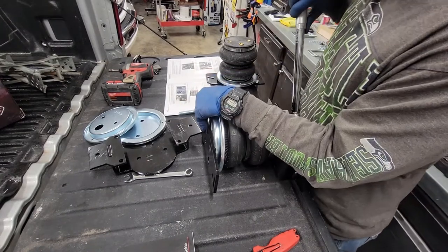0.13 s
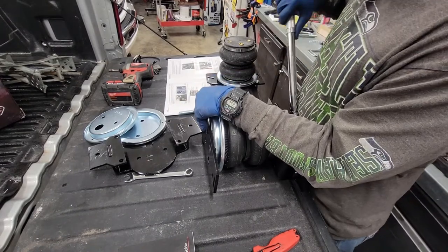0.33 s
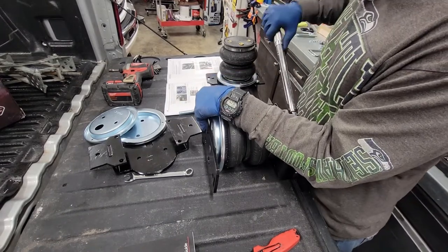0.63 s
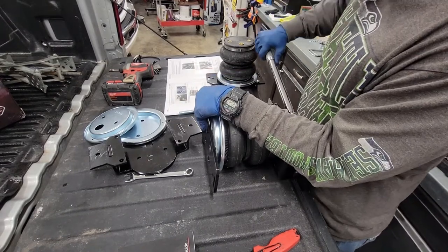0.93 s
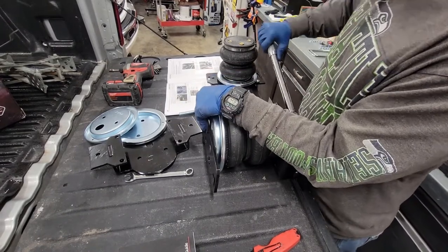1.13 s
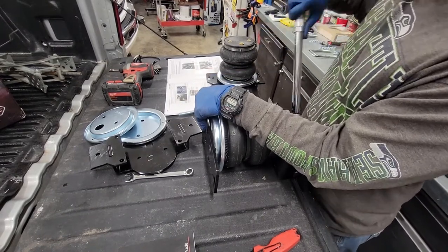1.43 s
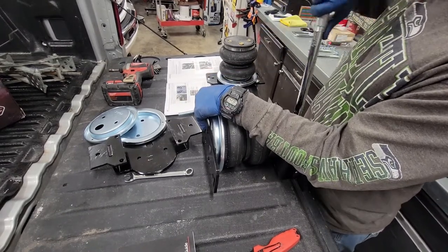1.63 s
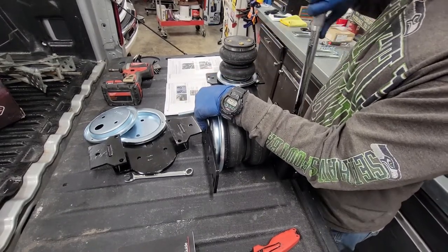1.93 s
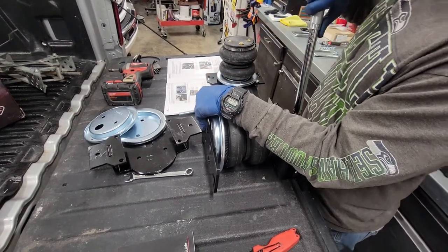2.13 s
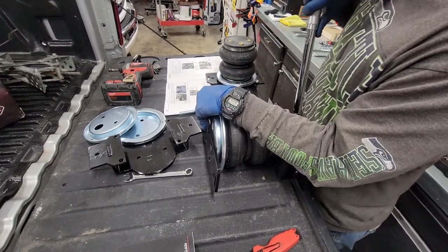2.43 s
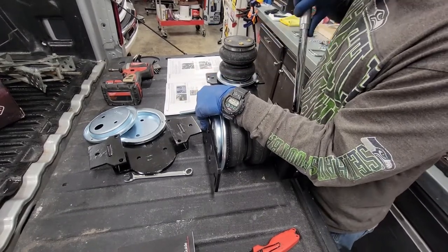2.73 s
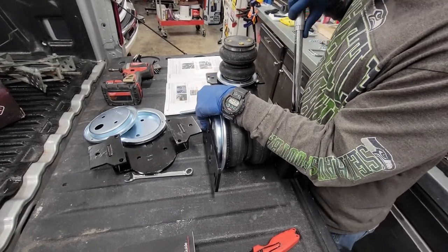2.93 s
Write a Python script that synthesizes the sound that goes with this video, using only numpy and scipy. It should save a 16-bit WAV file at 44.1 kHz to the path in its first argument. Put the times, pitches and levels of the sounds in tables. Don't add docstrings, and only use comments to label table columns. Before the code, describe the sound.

Torque wrench clicking over ratchet teeth on a truck bed, ending in a hard ringing snap

```python
import sys
import numpy as np
from scipy import signal
from scipy.fft import rfft, irfft
from scipy.io import wavfile

SR = 44100
rng = np.random.default_rng(int(sys.argv[2]) if len(sys.argv) > 2 else 0)


def wav_record(signal):
    frames = np.transpose(np.atleast_2d(signal))
    bounded = np.clip(frames, -1, 1)
    quanta = np.round(bounded * 32767).astype(np.int16)
    wavfile.write(sys.argv[1], SR, quanta)


def volts_from_decibels(level):
    exponent = np.asarray(level, float) / 20
    return 10 ** exponent


N = 136710

# pitch_hz, density_db [dB per Hz]
SHOP_COLOUR = [(13, -40), (22, -12.5), (81, 0), (125, -5), (179, -22.5), (261, -11), (418, -17.5),
               (764, -18), (2000, -37), (2600, -69), (4400, -120)]
# pitch_hz, likeness [-1 to 1]
LIKENESS = [(60, 1), (240, 0.48), (950, -0.63), (3770, 0.51), (15000, 0.64)]
# pitch_hz, width_hz, level_db
HUM = [(80, 5, -76.5), (252.4, 36, -68), (780, 45, -78.5)]
# pitch_hz, density_db [dB per Hz]
HISS_COLOUR = [(2000, -1.5), (3700, -9), (7800, -12), (8200, -25.5), (11500, -24.5), (12000, -17.5),
               (15500, -12)]
# time_s, level_db
HISS_SWELL = [(0.0, -78), (1.05, -82.5), (1.4, -78), (3.1, -85.5)]
SHOP_DB, HISS_GAIN_DB, HISS_TOP_HZ = -58.5, 2, 15700
HALF_OCTAVES_HZ = 22 * 2 ** np.arange(0, 9.8, 0.5)

# start_s, attack_s, hold_s, release_s
BRUSH_SHAPE = (0.089, 0.0062, 0.02, 0.055)
# pitch_hz, density_db [dB per Hz]
BRUSH_COLOUR = [(1470, -1.5), (2500, -6), (4000, -3.5), (5200, -3), (6300, 1), (8200, -6.5), (11500, -11),
                (16000, -17)]
BRUSH_DB = -63

# start_s, peak_db, deep_modes_db, upper_modes_db
ROCKS = [(1.03, -34.5, -16, -14), (1.109, -30, -3, -13), (1.152, -34, -10, -11.5), (1.178, -42.5, 2.5, -5),
         (1.2, -39, 4.5, -16.5), (1.249, -38.5, 1, -13), (1.284, -47.5, 9.5, -5), (1.36, -49.5, 2.5, -12.5),
         (1.426, -51.5, 6, 3.5), (1.473, -41, 5.5, -5.5), (1.549, -38.5, -4, -8), (1.712, -39.5, -1, -11.5),
         (1.827, -47.5, -8, -10), (1.889, -36.5, 3, -9), (1.921, -42.5, -8, -15), (1.949, -39.5, 4, -13.5),
         (1.994, -40, -13.5, -16), (2.02, -50, -1, -15), (2.034, -31, -0.5, -11), (2.069, -51.5, 12.5, -6),
         (2.211, -46.5, 3.5, -10), (2.287, -49, 4.5, -4), (2.369, -64.5, 16.5, -21),
         (2.899, -45.5, -4, -19)]
# pitch_hz, level_db, t60_s
PANEL = [(65.6, 2, 0.085), (86, -9, 0.34), (130.4, 0.5, 0.17), (155.7, -0.5, 0.13), (203, -8, 0.55),
         (227, 1, 0.12), (246.2, -6, 0.1), (284.5, -8, 0.13), (337.3, -9.5, 0.18), (384.2, -7.5, 0.1),
         (492, -13.5, 0.042), (602, -5.5, 0.066), (746, -19, 0.22)]
DEEP_BELOW_HZ, UPPER_FROM_HZ, UPPER_GAIN_DB = 140, 280, 11.0
ROCK_DB, ROCK_SPREAD_DB, ROCK_ROLL_S = -8, 2.5, 0.00142
ROCK_TRAVEL_CYCLES, RUBBER_HZ = 0.896, 522

# start_s, peak_db, upper_rings_db
KNOCKS = [(1.034, -46, -15), (1.153, -44, 1), (1.202, -51.5, -1.5), (1.25, -57, -1), (1.889, -57, -7.5),
          (1.946, -61.5, -0.5), (1.996, -56.5, -7), (2.037, -56, -7.5), (2.205, -62.5, 1.5),
          (2.224, -59, -2), (2.28, -70, 6), (2.899, -54, -29)]
# pitch_hz, level_db, t60_s
BRACKET = [(664, 3, 0.019), (779, -3, 0.082), (1080, 4.5, 0.012), (1350, -11.5, 0.0067), (1690, -4, 0.022),
           (1820, -10, 0.084), (2260, -9.5, 0.024), (2870, 4, 0.0052), (3030, -19, 0.022),
           (3520, -11.5, 0.051), (3960, -7, 0.0088)]
KNOCK_DB, KNOCK_CHATTER_S = -13.5, 0.0017

# start_s, peak_db, socket_clack_db, low_rings_db, brightness_db
TEETH = [(1.0832, -51, -1, 5, -26), (1.283, -35, -14, 7.5, -6.5), (1.3506, -34, -3.5, 0, -6),
         (1.4172, -32.5, -8, 4.5, -1), (1.479, -31, -19, 3.5, -2), (1.5416, -29, -10, -2, -3),
         (1.6222, -33, -36, 0.5, -1.5), (1.711, -31.5, -21, -3, -0.5), (1.8229, -41, -12.5, -7, -6.5),
         (2.2416, -71, 8, 8, -8), (2.268, -64, 9, -1, -11), (2.5218, -73, 7, 10.5, -7)]
# low_hz, low_db, high_hz, high_db, side_db
TOOTH_RINGS = [(4000, -62, 6300, -56, -3), (2850, -33.5, 5300, -35, 3), (3220, -43, 6000, -64, 4),
               (1410, -35.5, 6950, -33, -4), (3300, -47, 7730, -31, -1), (4540, -38.5, 5700, -38, 2.5),
               (3060, -41.5, 6900, -29, -0.5), (3490, -41.5, 6560, -27, 2), (3500, -51, 5020, -37, 8.5),
               (3500, -70, 7000, -60, 12), (3500, -74, 8200, -64, 9), (4260, -65, 7000, -73, 10)]
# pitch_hz, width_hz, level_db
PAWL = [(1690, 880, -5.5), (2620, 460, -6), (3490, 390, -4.5), (4880, 480, -3.5), (5500, 440, 0),
        (6370, 1000, 6.5), (7600, 660, -1), (8460, 700, -6), (9400, 610, -4.5), (10370, 1460, -2.5),
        (13700, 3000, 4.5), (15500, 770, 1)]
PAWL_DB, PAWL_SPREAD_DB, PAWL_CHATTER_S = -15, 3, 0.001
LOW_BELOW_HZ, BRIGHT_FROM_HZ = 4000, 7500
CLACK_HZ, CLACK_WIDTH_HZ, CLACK_DB = 1177, 64, -8
TOOTH_RING_WIDTH_HZ, TOOTH_RING_DB = 285, -13
BOUNCE_S, BOUNCE_SPREAD, BOUNCE_LOSS_DB = 0.0085, 0.25, 11

# start_s, snap_db, shaft_db, deep_panel_db
RELEASE = [
    (2.9919, -31.5, -33, -34.5),
    (3.0014, -57, -32, -27),
    (3.008, -44, -55, -55),
    (3.021, -52, -63, -48),
    (3.04, -62, -42, -46),
    (3.068, -54, -46.5, -41.5),
]
# pitch_hz, width_hz, level_db
SNAP = [(1110, 166, 3), (1780, 520, 4.5), (2540, 560, 3), (2840, 390, 4.5), (3370, 290, 5.5),
        (4140, 450, 0), (5200, 600, -2), (5950, 590, -3), (7280, 540, 5), (7590, 490, 2.5),
        (8900, 620, -17), (9800, 990, -10), (11900, 2500, -4), (14900, 2100, -4)]
# pitch_hz, level_db, t60_s, left_lean [share]
SHAFT = [(63.2, 7, 0.21, 0.2), (123.7, 1, 0.13, -0.099), (204, 1.5, 0.073, 0.11), (260, -1.5, 0.16, 0.028),
         (378, 2, 0.24, 0.013), (483.3, -6.5, 0.34, 0.43), (657, -11, 0.054, -1.3), (780, -9, 0.037, 0.86),
         (1103, -15, 0.065, -1.3), (2240, -8, 0.023, 0.92), (3090, -16, 0.055, -0.033),
         (3384, -14, 0.051, 0.67), (3580, -21, 0.077, -0.38), (7560, -27, 0.1, 0.42)]
SNAP_DB, SNAP_CHATTER_S = -7, 0.0012
SHAFT_DB, SHAFT_TRAVEL_CYCLES = 2.5, 0.73

# pitch_hz, t60_s
GARAGE_T60 = [(200, 0.2), (1000, 0.41), (4000, 0.3), (8000, 0.27), (15000, 0.3)]
FIRST_ECHO_S, GARAGE_DB, LOW_GARAGE_DB = 0.0021, -1, -4

SCATTER = 0.54
PAN_DB, LAG_S, LOW_LAG_S = 0.32, 0.00009, 0.00021
MIC_LOW_CUT_HZ, MIC_TOP_HZ = 34.4, 17000


def rms_one(x):
    return x / np.sqrt(np.mean(x ** 2) + 1e-20)


def at_hz(points, hz):
    table_hz, value = np.transpose(points)
    return np.interp(np.log(hz), np.log(table_hz), value)


def t60_of(width_hz):
    return np.log(1000) / (np.pi * width_hz)


def ring(x, hz, t60):
    r = volts_from_decibels(-60 / (t60 * SR))
    w = 2 * np.pi * hz / SR
    return signal.lfilter([0, np.sin(w)], [1, -2 * r * np.cos(w), r * r], x + 1e-18)


def damped(x, hz, width_hz):
    return ring(x, hz, t60_of(width_hz))


def blows(times, sizes):
    x = np.zeros(N)
    x[(times * SR).astype(int)] = sizes
    return x


def chatter(times, db, chatter_s, hz, t60, side, lean=0):
    t = np.arange(SR // 10) / SR / chatter_s
    touches = rng.standard_normal((2, len(times), len(t))) * t * np.exp(-t)
    rings = ring(touches, hz, t60)
    clean = ring(1.0 * (t == 0), hz, t60)
    rings *= np.sqrt(np.sum(clean ** 2) / np.sum(rings ** 2, axis=-1, keepdims=True))
    difference = SCATTER * rings[1] + np.reshape(lean, (-1, 1)) * rings[0]
    x = np.zeros((3, N + len(t)))
    at = (np.asarray(times)[:, None] * SR).astype(int) + np.arange(len(t))
    for row, sound in zip(x, (rings[0], side * clean, difference)):
        np.add.at(row, at, 3 * volts_from_decibels(db)[:, None] * sound)
    return x[:, :N]


def bands(white):
    for k, (low, high) in enumerate(zip(HALF_OCTAVES_HZ, HALF_OCTAVES_HZ[1:])):
        band = signal.butter(2, [low, high], "band", fs=SR, output="sos")
        yield np.sqrt(low * high), signal.sosfilt(band, white[k % 2])


def shop():
    rumble = np.zeros((2, N))
    for centre_hz, (mid, side) in bands(rng.standard_normal((2, 2, N))):
        alike = np.clip(at_hz(LIKENESS, centre_hz), -1, 1)
        pair = np.sqrt(1 + alike) * mid + np.sqrt(1 - alike) * side * [[1], [-1]]
        rumble += volts_from_decibels(at_hz(SHOP_COLOUR, centre_hz)) * (centre_hz < 2000) * pair
    white = rng.standard_normal((3, N))
    hz = np.arange(1, N // 2 + 2) * SR / N
    colour = volts_from_decibels(at_hz(HISS_COLOUR, hz)) * (hz > 2000) * (hz < HISS_TOP_HZ)
    hiss = rms_one(irfft(rfft(white[1:]) * colour, N))
    swell = volts_from_decibels(HISS_GAIN_DB + np.interp(np.arange(N) / SR, *np.transpose(HISS_SWELL)))
    hum = sum(volts_from_decibels(db) * rms_one(damped(white[0], pitch, width)) for pitch, width, db in HUM)
    return volts_from_decibels(SHOP_DB) * rms_one(rumble) + swell * hiss + hum


def sleeve():
    start, attack, hold, fade = BRUSH_SHAPE
    t = np.arange(N) / SR - start
    shape = np.clip(t / attack, 0, 1) * np.exp(-np.maximum(t - hold, 0) / fade)
    hz = np.arange(1, N // 2 + 2) * SR / N
    colour = volts_from_decibels(at_hz(BRUSH_COLOUR, hz)) * (hz > 1300) * (hz < HISS_TOP_HZ)
    noise = irfft(rfft(rng.standard_normal((2, N))) * colour, N)
    return volts_from_decibels(BRUSH_DB) * rms_one(noise) * shape


def tailgate():
    s, db, deep_db, upper_db = np.transpose(ROCKS)
    draw = rng.standard_normal((len(s), 2, len(PANEL)))
    out = np.zeros(N)
    for k, (hz, mode_db, t60) in enumerate(PANEL):
        share = deep_db * (hz < DEEP_BELOW_HZ) + (upper_db + UPPER_GAIN_DB) * (hz > UPPER_FROM_HZ)
        level = db + ROCK_DB + mode_db + share + ROCK_SPREAD_DB * draw[:, 0, k]
        roll = draw[:, 1, k]
        arrive = s + ROCK_TRAVEL_CYCLES / hz + ROCK_ROLL_S * np.abs(roll)
        out += ring(blows(arrive, np.sign(roll) * volts_from_decibels(level)), hz, t60)
    low_cut = signal.butter(2, 45, "high", fs=SR, output="sos")
    rubber = signal.butter(3, RUBBER_HZ, fs=SR, output="sos")
    return signal.sosfilt(np.vstack([low_cut, rubber]), out)


def bracket():
    s, db, upper_db = np.transpose(KNOCKS)
    out = np.zeros((3, N))
    for k, (hz, mode_db, t60) in enumerate(BRACKET):
        level = db + KNOCK_DB + mode_db + upper_db * (hz > 1500)
        out += chatter(s, level, KNOCK_CHATTER_S, hz, t60, (-1) ** k)
    return signal.sosfilt(signal.butter(2, 4500, fs=SR, output="sos"), out)


def ratchet():
    s, db, clack_db, low_db, bright_db = np.transpose(TEETH)
    spread = PAWL_SPREAD_DB * rng.standard_normal((len(s), len(PAWL)))
    lean = np.tanh(np.array(TOOTH_RINGS)[:, -1] / 17)
    bounce_s = s + BOUNCE_S * np.exp(BOUNCE_SPREAD * rng.standard_normal(len(s)))
    clack = blows(s + PAWL_CHATTER_S, volts_from_decibels(db + clack_db + CLACK_DB))
    out = damped(clack, CLACK_HZ, CLACK_WIDTH_HZ) * [[1], [1], [0]]
    for k, (hz, width_hz, mode_db) in enumerate(PAWL):
        lift = bright_db * (hz > BRIGHT_FROM_HZ) + low_db * (hz < LOW_BELOW_HZ)
        level = db + PAWL_DB + mode_db + lift
        bounce_db = level - BOUNCE_LOSS_DB - 2 * spread[:, k]
        t60, side = t60_of(width_hz), (-1) ** k
        out += chatter(s, level + spread[:, k], PAWL_CHATTER_S, hz, t60, side, lean)
        out += chatter(bounce_s, bounce_db, 2 * PAWL_CHATTER_S, hz, t60, side, lean)
    t60 = t60_of(TOOTH_RING_WIDTH_HZ)
    for at, tooth_lean, (low_hz, low_ring_db, high_hz, high_ring_db, _) in zip(s, lean, TOOTH_RINGS):
        for hz, ring_db in ((low_hz, low_ring_db), (high_hz, high_ring_db)):
            level = np.array([ring_db + TOOTH_RING_DB])
            out += chatter([at], level, PAWL_CHATTER_S, hz, t60, 0.43, tooth_lean)
    return out


def release():
    s, snap_db, shaft_db, deep_db = np.transpose(RELEASE)
    snap = np.zeros((3, N))
    for k, (hz, width_hz, mode_db) in enumerate(SNAP):
        snap += chatter(s, snap_db + SNAP_DB + mode_db, SNAP_CHATTER_S, hz, t60_of(width_hz), (-1) ** k)
    shaft = np.zeros((2, N))
    for hz, mode_db, t60, left in SHAFT:
        deep = hz < DEEP_BELOW_HZ
        delay_s = 0 if deep else SHAFT_TRAVEL_CYCLES / hz
        hits = blows(s + delay_s, volts_from_decibels(SHAFT_DB + mode_db + (deep_db if deep else shaft_db)))
        polarity = 1 if deep else -1
        shaft += polarity * ring(hits, hz, t60) * [[1], [left]]
    return snap, shaft


def garage(x):
    t = np.arange(SR // 2) / SR
    rise = np.clip(t / FIRST_ECHO_S - 0.5, 0, 1)
    tail = np.zeros((2, len(t)))
    for hz, band in bands(rng.standard_normal((2, 2, len(t)))):
        tail += rise * band * volts_from_decibels(-60 * t / at_hz(GARAGE_T60, hz))
    tail /= np.sqrt(np.sum(tail ** 2, axis=1, keepdims=True))
    wet = signal.fftconvolve(x[None], tail, axes=1)[:, :N]
    return signal.sosfilt(signal.cheby2(10, 40, HISS_TOP_HZ + 200, fs=SR, output="sos"), wet)


def heard(mid, side, lag_s):
    n = np.arange(N)
    left = np.interp(n - lag_s * SR, n, mid + side)
    return np.array([left * volts_from_decibels(PAN_DB), (mid - side) * volts_from_decibels(-PAN_DB)])


def scene():
    snap, shaft = release()
    sharp = ratchet() + bracket() + snap
    low = tailgate() + shaft[0]
    wet = garage(volts_from_decibels(GARAGE_DB) * sharp[1] + volts_from_decibels(LOW_GARAGE_DB) * low)
    direct = heard(sharp[0], sharp[2], LAG_S) + heard(low, shaft[1], LOW_LAG_S)
    return direct + wet + shop() + sleeve()


def roll_off(x):
    return signal.sosfilt(signal.butter(12, 16650, fs=SR, output="sos"), x)


def record(dry):
    low_cut = signal.butter(2, MIC_LOW_CUT_HZ, "high", fs=SR, output="sos")
    top_cut = signal.cheby2(10, 60, MIC_TOP_HZ, fs=SR, output="sos")
    mix = signal.sosfilt(top_cut, signal.sosfilt(low_cut, dry))
    return roll_off(mix)


dry = scene()
out = record(dry)
wav_record(out)
```